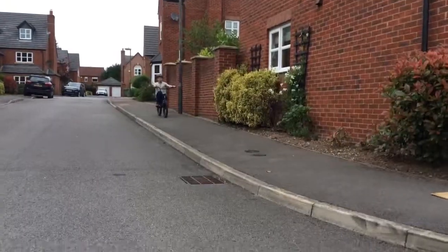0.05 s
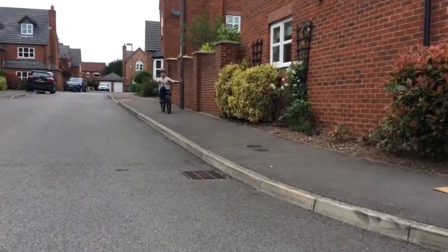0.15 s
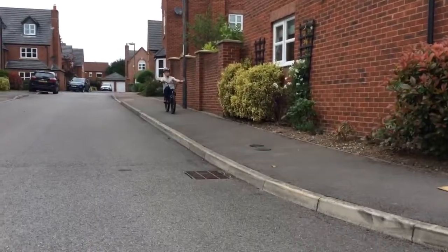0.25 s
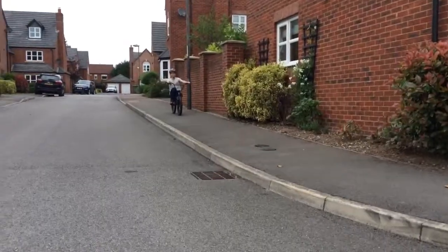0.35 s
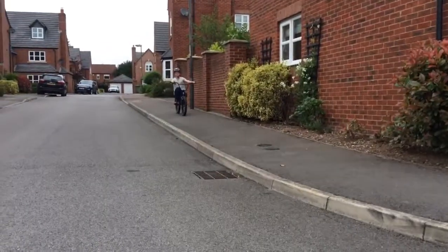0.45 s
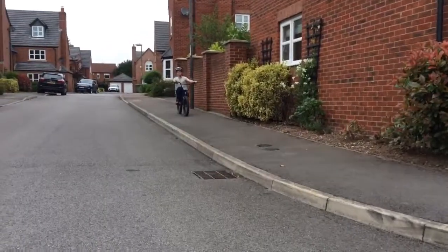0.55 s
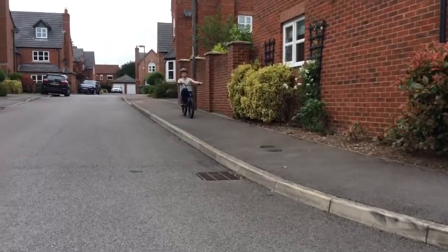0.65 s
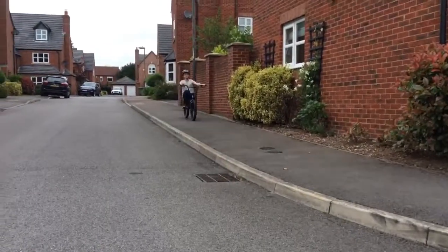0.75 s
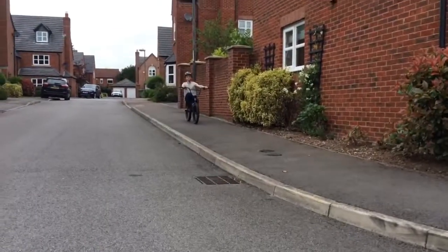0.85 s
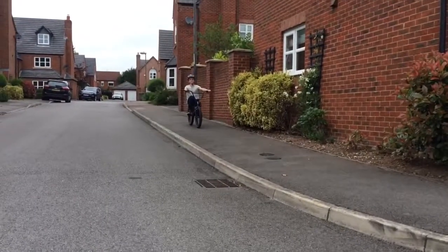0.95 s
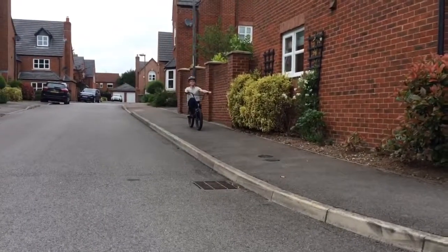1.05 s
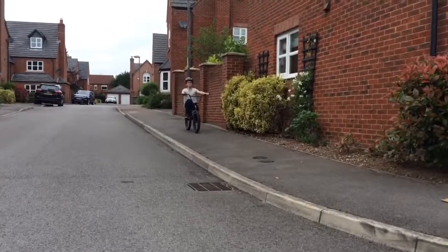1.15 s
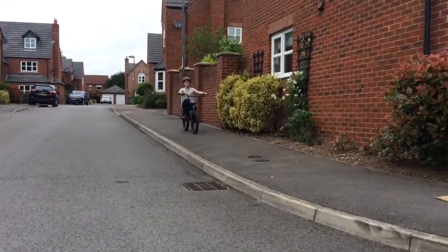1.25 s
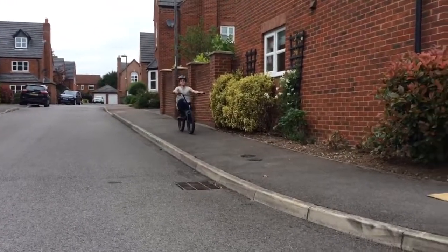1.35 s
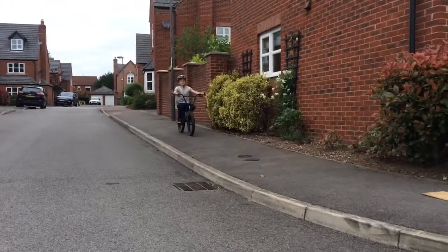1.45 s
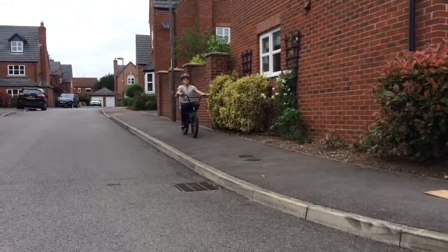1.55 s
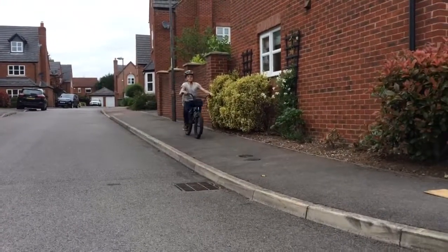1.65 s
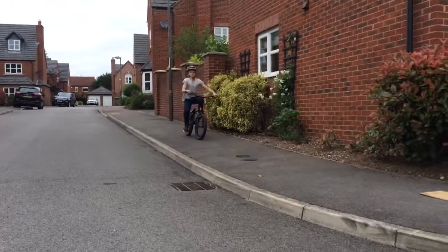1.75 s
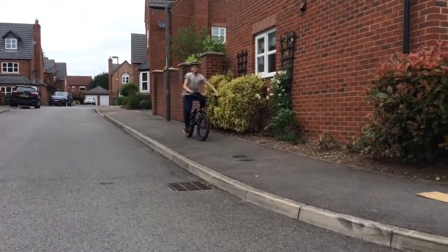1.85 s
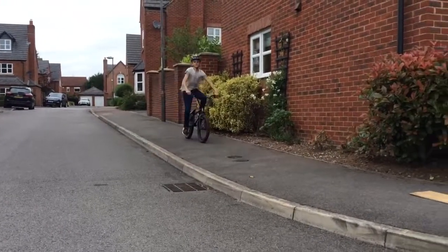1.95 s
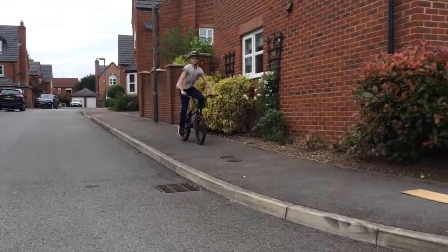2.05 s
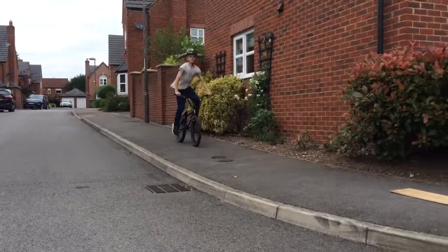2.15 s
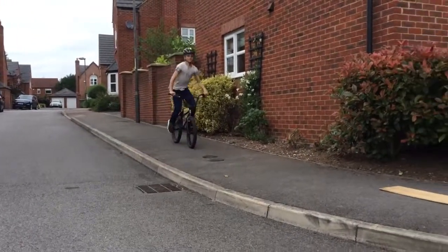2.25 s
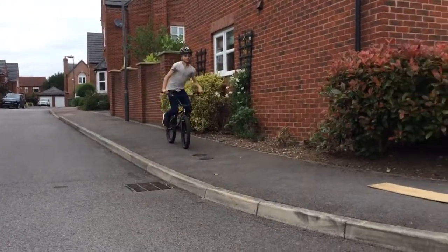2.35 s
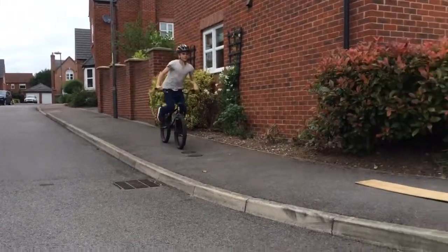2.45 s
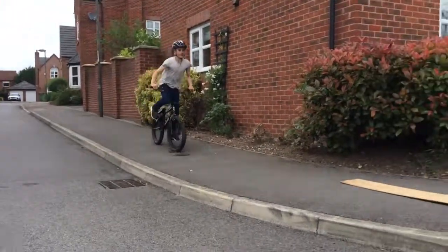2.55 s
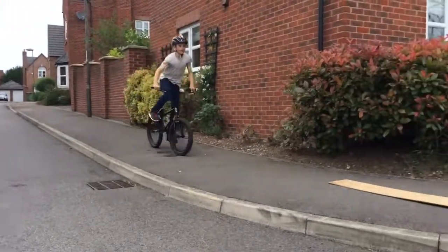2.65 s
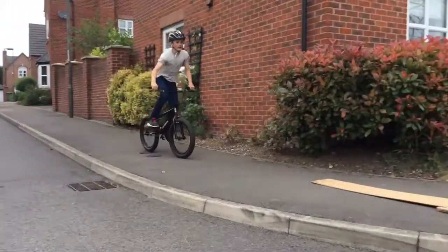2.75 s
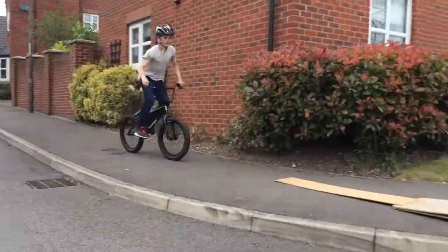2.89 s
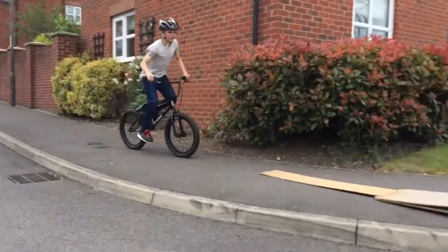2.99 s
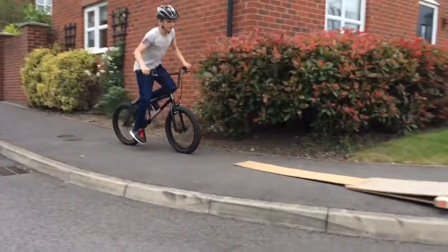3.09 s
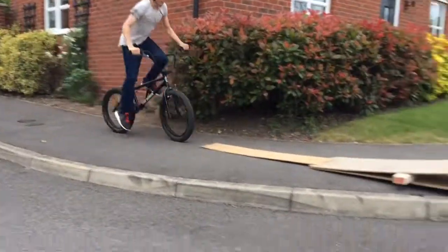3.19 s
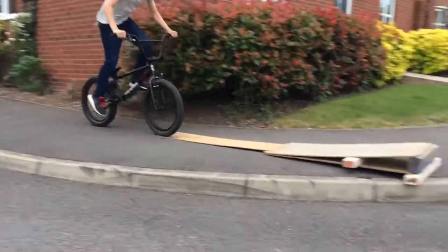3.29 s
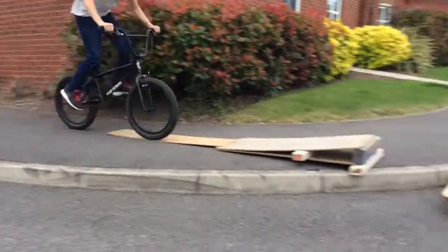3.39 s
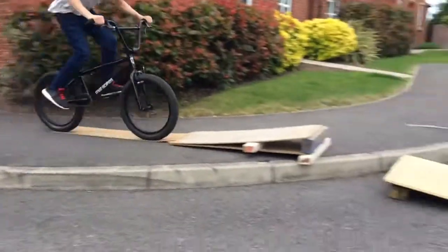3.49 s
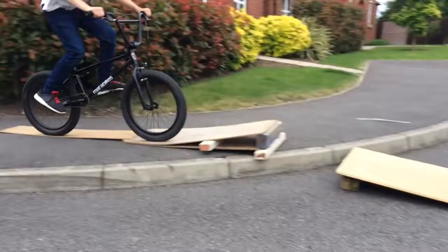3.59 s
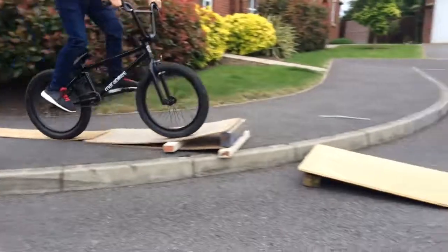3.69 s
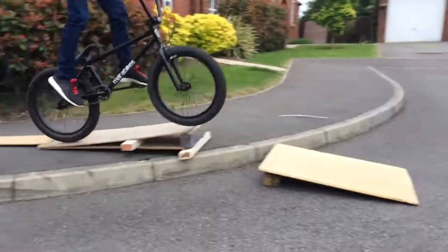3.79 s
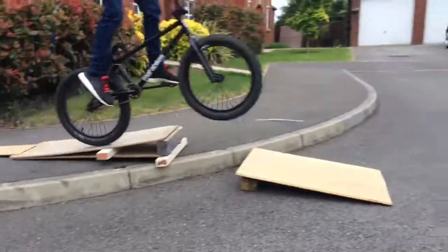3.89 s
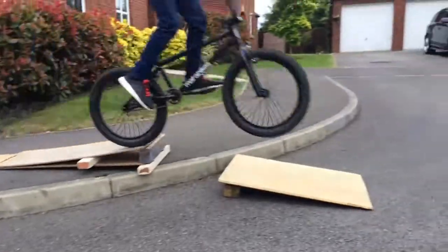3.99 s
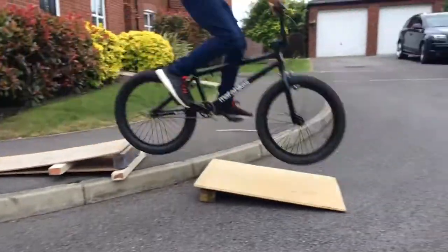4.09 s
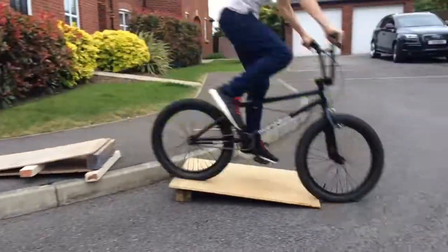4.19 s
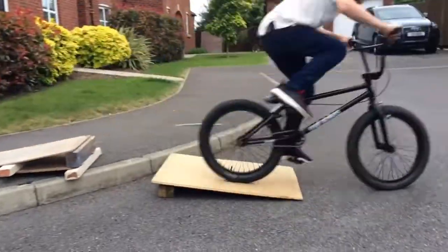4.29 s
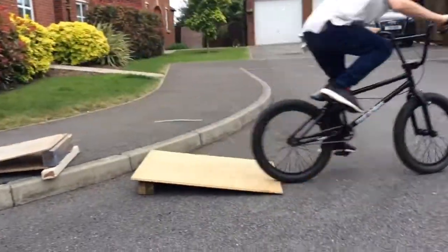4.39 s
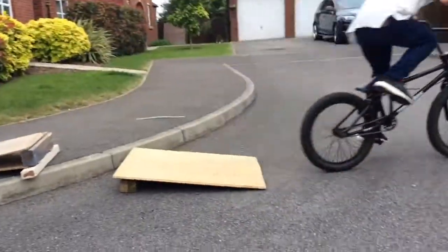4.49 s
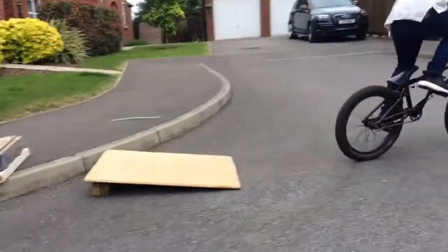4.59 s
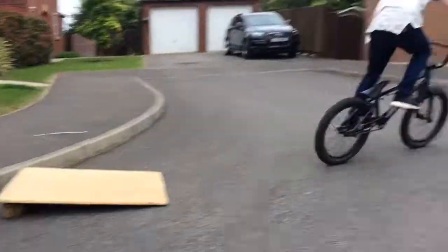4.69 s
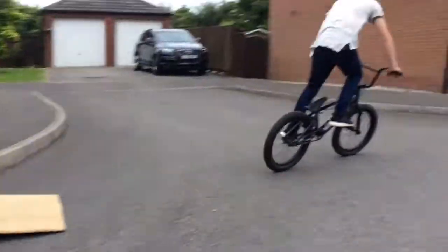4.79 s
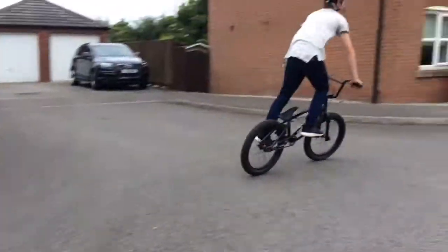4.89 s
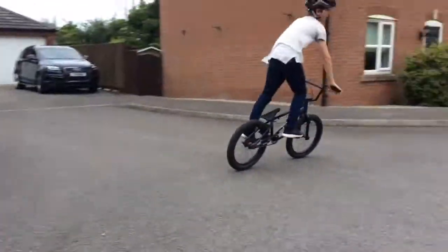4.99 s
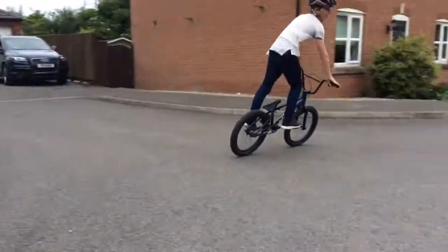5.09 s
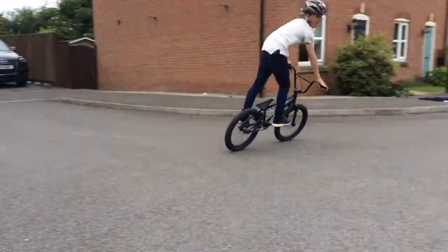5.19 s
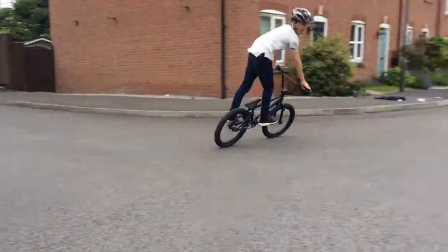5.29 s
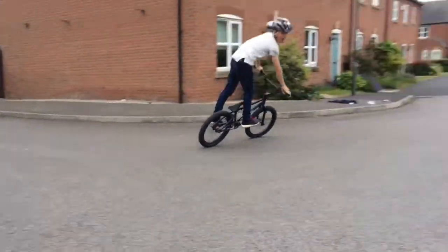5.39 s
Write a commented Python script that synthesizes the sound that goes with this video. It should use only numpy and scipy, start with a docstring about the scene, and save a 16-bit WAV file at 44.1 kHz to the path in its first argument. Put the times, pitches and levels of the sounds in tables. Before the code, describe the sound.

A quiet street with faint low traffic rumble and soft gusts on the microphone. From 0 to about 1.5 s a distant bicycle freewheel ticks at roughly 40 per second, blurred by distance, with a tiny knock at the end; a short flurry of ticks follows near 2 s. Tyre hiss and grit grow as it nears, with dull pavement knocks at 2.6 and 2.9 s. Stones ping from 3.15 s, then a loud sharp crack at 3.35 s. From 3.5 to 4 s loose boards clatter and drum hollowly under fast ticking, with the loudest snaps around 3.9 s. A brief near-silent flight follows, then hard plywood slaps and thuds at 4.25 to 4.32 s, a smaller bounce at 4.4 s, fluttering metal jingle and a short breathy tyre song. Clear ticking, speeding up, rolls away from 4.7 to 5.4 s, with a thin reflected tail from the house fronts.

```python
"""A small stunt bicycle coasts along a quiet street: its freewheel ticks as three pawls drop at every
tooth, and filtered noise makes its tyres hiss, sing and flick grit. They ping stones; it clatters up
loose boards, flies for a moment and lands, one wheel after the other, on a plywood ramp and the road:
sharp pressure pulses crack, damped sines and noise ring the wood, fluttering modes jingle in the metal.
It rolls away over faint traffic and breeze; the house fronts answer with a thin tail of dying noise."""
import sys
import numpy as np
from scipy import signal
from scipy.fft import rfft, irfft
from scipy.io import wavfile

SR = 44100
rng = np.random.default_rng(int(sys.argv[2]) if len(sys.argv) > 2 else 0)


def unload_audio(sound):
    """Save the sound as a 16-bit wav file, at the path given as the first command line argument."""
    columns = np.transpose(np.atleast_2d(sound))
    # keep every value between -1 and 1, then stretch to whole-number steps
    steps = np.round(np.clip(columns, -1, 1) * 32767)
    wavfile.write(sys.argv[1], SR, steps.astype(np.int16))


N = 239948
TIME = np.arange(N) / SR
AGE = TIME[:SR // 3]  # seconds since a blow

# Noise colours set balance only, since the noise is scaled to rms 1.
# distant traffic and air: [f/Hz, level/dB]
STREET = [(20, -21), (50, -4), (86, 0), (125, -5), (190, -7), (330, -16), (550, -20), (1000, -20),
          (1500, -24), (2000, -28), (3000, -32), (6000, -34), (8000, -37), (15000, -40)]
# breeze rumbling on the microphone: [f/Hz, level/dB]
BUFFET = [(20, -28), (45, -4.5), (75, 0), (110, -8), (200, -24), (600, -60), (3000, -100)]
# gusts on the microphone: [t/s, time to fall to 1/e /s, level/dB]
GUSTS = [(0.05, 0.11, -64), (1.0, .4, -63.5), (2.35, 0.068, -65), (4.85, 0.21, -62)]
# the bicycle's distance from the microphone: [t/s, distance/m]
DISTANCE = [(0, 26.6), (1.4, 16.2), (2.05, 9.6), (3.0, 4.15), (3.5, 3.06), (3.83, 2.5), (4.03, 1.73),
            (4.48, 1.22), (4.9, 2.95), (5.44, 2.96)]
# colour of the tread's hiss: [f/Hz, level/dB]
TREAD = [(60, -3), (200, 11), (400, 5.5), (800, 1), (1400, -2.5), (2000, -3), (2800, -8), (4500, -9.5),
         (8000, -19), (15000, -16)]
# colour of tyres drumming on hollow boards: [f/Hz, level/dB]
DRUM = [(40, -18), (120, 8), (300, 0.5), (700, -18), (1500, -16), (4000, -20), (12000, -27)]
# tyres pressed hard at take-off and on landing: [t/s, level of added tread gain/dB, t60/s]
SQUASHES = [(3.84, 14, 0.72), (4.265, 20.5, 0.46)]
# the tread sings as it bites into the road: [t/s, level/dB, t60/s]
BITES = [(4.33, -55, .4), (4.57, -52.5, 0.58), (4.8, -66, 5.1)]
# stretches of coasting; the pedals move, so the pawls' rate swings: a curve each, [t/s, rate/ticks per s]
COASTS = [
    [(0.001, 36.5), (0.3, 35.5), (0.45, 39.6), (0.8, 39.4), (0.9, 43.6), (1.05, 40.7), (1.45, 48.8)],
    [(1.94, 25.1), (2.0, 43.0), (2.07, 16.1)],
    [(3.44, 29.8), (3.55, 70.2), (3.61, 85.6), (3.71, 61.6), (3.8, 46.2), (3.89, 44.8), (3.95, 58.6),
     (4.04, 65.1), (4.09, 18.1)],
    [(4.374, 60.6), (4.41, 87.3), (4.49, 73.9), (4.575, 22.6)],
    [(4.622, 56), (4.645, 56)],
    [(4.692, 29.0), (4.77, 39.8), (4.82, 34.4), (4.95, 39.0), (5.01, 56.6), (5.09, 53.3), (5.14, 74.1),
     (5.22, 65.0), (5.44, 74.6)],
]
# the hub's colour: [f/Hz, level/dB]
PAWL = [(600, -52), (1400, -4), (2000, -2), (2800, -7), (4000, 0.5), (5000, 0), (6400, -6.5), (8000, -4),
        (9700, -2), (11500, 1.5), (12400, -1.5), (13200, 5.5), (13900, -3), (15000, 1)]
# tail of the house fronts, balance only: [f/Hz, level per octave/dB, t60/s]
HOUSES = [(112.6, 0, 0.76), (267, -11.5, 0.83), (516, -12, 1), (1110, -7.5, 0.53), (1820, -7, 0.35),
          (4100, -4.5, 0.64), (8460, -7, 0.72), (15000, 13, 0.12)]
# tyres knock over joints and a cover in the pavement: [t/s, level/dB, hardness/dB]
BUMPS = [(1.556, -60, -8), (2.619, -42, -1), (2.863, -48, -12)]
# body of such a knock before hardness: [f/Hz, level per octave/dB, t60/s]
BUMP = [(200, -4, .08), (400, -3, .06), (800, -3, .045), (1600, -13, .03), (3200, -20, .03),
        (6400, -22, .025)]
# sharp cracks: stones pinged by the tyres, then hard edges of the boards snapping:
# [t/s, level/dB, brightness/dB]
CRACKS = [(3.158, -34.5, 5), (3.2581, -36.5, 8), (3.332, -32, -2), (3.3477, -7, -3), (3.534, -22, 4),
          (3.5445, -11.5, -3.5), (3.8924, -5, -45), (3.9201, -9, -30), (3.9929, -14, -45),
          (4.275, -22.5, -11)]
# brief ring of a crack before brightness: [f/Hz, level/dB, t60/s]
CRACK_MODES = [(1390, -8, 0.001), (2476, -5, 0.006), (3340, -5, 0.0054), (3780, -5, 0.0026),
               (5370, -3, 0.0051), (8040, -14.5, 0.0077)]
# colour of grit, and before brightness of the scatter after a crack: [f/Hz, level/dB]
SPLINTER = [(200, -18), (900, 0.5), (2800, -0.5), (5000, -7.5), (9000, -8.5), (15000, -31)]
# a wheel slaps the take-off boards, then its weight thumps down:
# [t/s, slap level/dB, hardness/dB, lag/s, thump level/dB]
TAKEOFF_BLOWS = [(3.350, -38.5, -6, .026, -45.5), (3.545, -27.5, 4, .0085, -29),
                 (3.675, -34, 3, .016, -26.5), (3.742, -31, -14, 0.0016, -28.5),
                 (3.8935, -18.5, -5.5, .0075, -22.5), (3.921, -36.5, 6, .008, -27.5),
                 (3.994, -33.5, 1, .014, -39.5)]
# what the take-off boards ring with, before load and blow colour: [f/Hz, level/dB, t60/s]
TAKEOFF_MODES = [(114, -18.5, 0.15), (156, -19, 0.11), (209, -13.5, 0.078), (316, -10, 0.095),
                 (511.5, -10, 0.12), (686, -6, 0.1), (920, -12.5, 0.08), (1090, -33, .04),
                 (1513, -9, 0.027), (1610, -11, 0.023), (2220, -19, 0.022)]
# the crowd of weaker wood modes, before load and blow colour: [f/Hz, level per octave/dB, t60/s]
WOOD_CROWD = [(98, -22, 0.15), (195, -11.5, 0.17), (410, -10.5, 0.14), (740, -9, 0.079), (1500, -12, 0.061),
              (3330, -10.5, 0.031), (6300, -20, 0.027), (12800, -26, 0.098)]
# the landing ramp takes the front wheel, hits the road, takes the back wheel and bounces twice:
# [t/s, slap level/dB, hardness/dB, lag/s, thump level/dB]
LANDING_BLOWS = [(4.2535, -22.5, 4, .0077, -20.5), (4.2678, -17, 1, 0.0098, -26.5),
                 (4.3145, -16.5, 0.5, .021, -20), (4.408, -25, -19, .012, -38),
                 (4.531, -46, -31, 0.0082, -41.5)]
# what the plywood rings with, before load and blow colour: [f/Hz, level/dB, t60/s]
LANDING_MODES = [(59, -20, 0.31), (98, -20.5, 0.097), (144, -20, 0.13), (212, -18, 0.034),
                 (317.6, -1.5, 0.1), (385, -5, 0.064), (557, -12, 0.12), (719, -7.5, 0.057),
                 (900, -9.5, 0.1), (982, -6.5, 0.061), (1306, -4.5, 0.047), (1363, -3.5, 0.038),
                 (1772, -7, 0.034), (2236, -9, 0.027), (2900, -6.5, 0.02)]
# jolts to the bicycle's metal parts: [t/s, level/dB]
JOLTS = [(4.325, -37), (4.337, -62), (4.392, -44), (4.401, -42)]
# metal ring before damping and random unevenness: [f/Hz, level/dB, undamped t60/s]
METAL_MODES = [(3311, 0, .25), (3397, -1, .28), (3601, -2, .22), (4050, -8, .18), (4720, -2, .12),
               (5550, -6, .14), (6700, -9, .16), (7950, -7, .14), (9170, -8, .2), (9324, -6, .2),
               (9480, -5, .2), (9663, -9, .25), (10218, -10, .2), (12400, -10, .15)]

STREET_DB, BREEZE_DB = -64.5, -69
ROLL_DB, FLIGHT_DB, GRIP_S = -50, -6.5, 0.037  # tread at 1 m, its change in the air, contact fade
DRUM_DB = -50.5  # tyres drumming on the hollow boards
BOARDS_S, FLIGHT_S = (3.515, 4.02), (4.08, 4.25)  # on the boards, and in the air: (from s, to s)
HUB_DB = -29.5  # a tick at 1 m, before blur and unevenness
BLUR_M = 14.2  # beyond this distance scatter from the walls outweighs the direct tick
# blow colours: (bass dB, middle dB, treble dB); hardness is added to a slap's middle and treble
TAKEOFF_SLAP, TAKEOFF_THUMP = (-1.5, 4.3, 1.5), (-1.2, -10, -7.5)
LANDING_SLAP, LANDING_THUMP = (-13.5, 4.5, -2.7), (4.1, -6, -5.5)
EDGE_HZ = 15400  # cutoff of the recorder's low-pass


def amp(db):
    """Decibels to gain."""
    return 10 ** (np.asarray(db) / 20)


def evened(x):
    """Scales to rms 1."""
    return x / np.sqrt(np.mean(x ** 2) + 1e-20)


def add(mix, s, sound):
    """Lays a sound into the mix at time s."""
    part = mix[max(round(s * SR), 0):][:len(sound)]
    part += sound[:len(part)]


def noise(spectrum, size):
    """Noise of rms 1 with a (Hz, dB) spectrum."""
    hz, db = np.transpose(spectrum)
    log_hz = np.log(np.fft.rfftfreq(size, 1 / SR) + 1)
    colour = amp(np.interp(log_hz, np.log(hz), db))
    return evened(irfft(rfft(rng.standard_normal(size)) * colour, size))


def dying(t, t60):
    """Envelope that loses 60 dB in t60."""
    return np.exp(-np.log(1000) * t / t60)


def ring(modes):
    """Damped sines that all start together, with alternating sign."""
    out = np.zeros(len(AGE))
    for k, (hz, db, t60) in enumerate(modes):
        out += (-1) ** k * amp(db) * dying(AGE, t60) * np.sin(2 * np.pi * hz * AGE)
    return out


def crowd(bands, t):
    """Countless unresolved modes: overlapping bands of noise, each dying at its own speed."""
    octave = np.log2(np.fft.rfftfreq(len(t), 1 / SR) + 1)
    out = np.zeros(len(t))
    for hz, db, t60 in bands:
        window = np.cos(np.pi / 2 * np.clip(octave - np.log2(hz), -1, 1))
        band = evened(irfft(rfft(rng.standard_normal(len(t))) * window, len(t)))
        out += amp(db) * dying(t, t60) * band
    return out


def distance(s):
    """Metres from the bicycle to the microphone at time s."""
    return np.interp(s, *np.transpose(DISTANCE))


def during(start, end):
    """1 from start to end, fading as the tyres make and lose contact."""
    return np.clip(np.minimum(TIME - start, end - TIME) / GRIP_S + .5, 0, 1)


def surges(rows):
    """Gain that rises as the tyres grip and then dies away, once for each (s, dB, t60 s)."""
    out = np.zeros(N)
    for s, db, t60 in rows:
        out += amp(db) * during(s, np.inf) * dying(np.maximum(TIME - s, 0), t60)
    return out


def air():
    """Distant traffic, and a light breeze with a few gusts on the microphone."""
    breeze = np.full(N, amp(BREEZE_DB))
    for s, spread, db in GUSTS:
        breeze += amp(db) * np.exp(-((TIME - s) / spread) ** 2)
    return amp(STREET_DB) * noise(STREET, N) + breeze * noise(BUFFET, N)


def tyres(grit_per_s=60, grit_t60=0.0058, sing_hz=2020, sing_width_hz=380):
    """Tread hisses, sings and flicks grit, hiss and grit louder near and under load; boards drum."""
    stones = (rng.random(N) < grit_per_s / SR) * np.minimum(rng.exponential(1, N), 3)
    grit = signal.oaconvolve(stones, dying(TIME[:1024], grit_t60))[:N] * noise(SPLINTER, N)
    resonance = signal.iirpeak(sing_hz, sing_hz / sing_width_hz, SR)
    song = evened(signal.lfilter(*resonance, rng.standard_normal(N)))
    contact = amp(ROLL_DB + FLIGHT_DB * during(*FLIGHT_S))
    rolling = contact * (1 + surges(SQUASHES)) / distance(TIME)
    drumming = amp(DRUM_DB) * during(*BOARDS_S) * noise(DRUM, N)
    return rolling * (noise(TREAD, N) + grit) + surges(BITES) * song + drumming


def teeth(coast):
    """The moments at which the pawls drop off a tooth, along a curve of (s, ticks per s)."""
    s, rate = np.transpose(coast)
    t = np.arange(s[0], s[-1], 1 / SR)
    passed = np.cumsum(np.interp(t, s, rate)) / SR
    return np.interp(np.arange(0, passed[-1]), passed, t)


def freewheel(pawl_gap=0.0014, click_t60=0.013, scatter_t60=0.086, uneven_db=-0.3, detune=0.023,
              patchy_db=1.5, alike=0.22):
    """Three pawls drop almost together at each tooth; distance fades the click and smears it."""
    out, t = np.zeros(N), TIME[:2048]
    hub = noise(PAWL, len(t))  # the ring that all ticks have in common; alike is its share of the power
    for s in np.concatenate([teeth(coast) for coast in COASTS]):
        drops = pawl_gap * np.array([0, rng.uniform(0.44, 1), rng.uniform(1, 2.8)])
        click = np.zeros(len(t))  # envelopes add up as power
        for drop, force in zip(drops, [.3, .8, .6]):
            click += (t >= drop) * force * dying(abs(t - drop), click_t60) ** 2
        scatter = dying(t, scatter_t60) ** 2 * (1 - np.exp(-t / pawl_gap))
        metres = distance(s)
        blur = metres ** 2 / (metres ** 2 + BLUR_M ** 2)
        power = (1 - blur) * click + blur * scatter
        tooth = 1 + detune * rng.standard_normal()  # every tooth rings the hub a little differently
        colour = [(hz * tooth, db + patchy_db * rng.standard_normal()) for hz, db in PAWL]
        tone = np.sqrt(alike) * hub + np.sqrt(1 - alike) * noise(colour, len(t))
        level = amp(HUB_DB + uneven_db * rng.standard_normal()) / metres
        add(out, s, level * np.sqrt(power) * tone)
    return out


def street(x, wet_db=-25, delay=0.0076, build=0.021):
    """House fronts and garden walls return a thin, late tail."""
    t = TIME[:SR]
    tail = crowd(HOUSES, t) * (1 - np.exp(-np.maximum(t - delay, 0) / build))
    return x + amp(wet_db) * signal.fftconvolve(x, tail / np.linalg.norm(tail))[:N]


def bumps():
    """Short dull knocks of the tyres on the pavement; hardness sets their upper bands."""
    out = np.zeros(N)
    for s, db, hard_db in BUMPS:
        bands = [(hz, d + hard_db * np.interp(hz, [400, 1200], [0, 1]), t60) for hz, d, t60 in BUMP]
        add(out, s, amp(db) * crowd(bands, AGE))
    return out


def brightened(rows, bright_db):
    """Tilts the treble of (Hz, dB, ...) rows, fully from 8 kHz up."""
    return [(hz, db + bright_db * np.interp(hz, [4300, 8000], [0, 1]), *rest) for hz, db, *rest in rows]


def cracks(snap_db=-1, snap_hz=3400, ring_db=-3, scatter_db=-23, scatter_t60=0.075,
           burst_db=-14, burst_t60=0.017, low_hz=1400):
    """Pinged stones, then snapping board edges: a pressure pulse, a brief ring, scatter from the ground."""
    out = np.zeros(N)
    spread = amp(scatter_db) * dying(AGE, scatter_t60) + amp(burst_db) * dying(AGE, burst_t60)
    u = np.pi * snap_hz * AGE - np.e
    snap = amp(snap_db) * (2 * u ** 2 - 1) * np.exp(-u ** 2)  # air squeezed out, then a suction
    for s, db, bright_db in CRACKS:
        body = amp(ring_db) * ring(brightened(CRACK_MODES, bright_db))
        scatter = spread * noise(brightened(SPLINTER, bright_db), len(AGE))
        add(out, s, amp(db) * (snap + body + scatter))
    thin = signal.butter(2, low_hz, "high", fs=SR)  # the cracks carry no bass
    return signal.lfilter(*thin, out)


def contacts(rows, slap, thump):
    """Each wheel contact is two blows, slap then thump: (s, dB, bass dB, middle dB, treble dB)."""
    bass_db, middle_db, treble_db = slap
    blows = []
    for s, slap_db, hard_db, lag, thump_db in rows:
        blows.append((s, slap_db, bass_db, middle_db + hard_db, treble_db + hard_db))
        blows.append((s + lag, thump_db, *thump))
    return blows


def rattle(per_s=50, tap_db=-44, uneven_db=5.5, bass_db=-6, middle_db=1, treble_db=4):
    """The loose boards tap against each other at random while the wheels roll over them."""
    blows = []
    for slot in np.arange(*BOARDS_S, 1 / per_s):
        s = slot + rng.random() / per_s
        blows.append((s, tap_db + uneven_db * rng.standard_normal(), bass_db, middle_db, treble_db))
    return blows


def struck(rows, bass_db, middle_db, treble_db, detune):
    """Colours wood modes for one blow and shifts them under the wheel's weight."""
    hz, mode_db, t60 = np.transpose(rows)
    bends = np.log([330, 750, 1400, 3000])
    colour = np.interp(np.log(hz), bends, [bass_db, 0, middle_db, treble_db])
    load = 1 + detune * rng.standard_normal(len(hz))
    return zip(hz * load, mode_db + colour, t60)


def boards(blows, modes, crowd_db, rise, detune=0.018):
    """Each blow rings the wood; a soft tyre favours the low modes, a hard slap the high ones."""
    out = np.zeros(N)
    for s, db, *colour in blows:
        clear = ring(struck(modes, *colour, detune))
        dense = amp(crowd_db) * crowd(struck(WOOD_CROWD, *colour, detune), AGE)
        add(out, s, amp(db) * (clear + dense) * (1 - np.exp(-AGE / rise)))
    return out


def jingle(uneven_db=4.5, rough=0.98, chatter_hz=70, damping=0.58, clatter_db=-1, clatter_t60=0.14):
    """Spokes and chain ring after the landing, chattering together so that every mode flutters."""
    out = np.zeros(N)
    flutter = [(chatter_hz, 0), (2 * chatter_hz, -10), (10 * chatter_hz, -60)]  # (Hz, dB)
    for s, db in JOLTS:
        for hz, mode_db, t60 in METAL_MODES:
            mode = ring([(hz, mode_db + uneven_db * rng.standard_normal(), damping * t60)])
            add(out, s, amp(db) * mode * (1 - rough + rough * noise(flutter, len(AGE))))
        links = noise(PAWL, len(AGE)) * noise(flutter, len(AGE))  # the chain shakes on the hub
        add(out, s, amp(db + clatter_db) * dying(AGE, clatter_t60) * links)
    return out


def scene():
    """The bicycle, the two ramps and the street."""
    takeoff_blows = contacts(TAKEOFF_BLOWS, TAKEOFF_SLAP, TAKEOFF_THUMP) + rattle()
    takeoff = boards(takeoff_blows, TAKEOFF_MODES, crowd_db=2.5, rise=0.00022)
    landing_blows = contacts(LANDING_BLOWS, LANDING_SLAP, LANDING_THUMP)
    landing = boards(landing_blows, LANDING_MODES, crowd_db=0.0, rise=0.00015)
    bicycle = tyres() + freewheel() + bumps() + cracks() + takeoff + landing + jingle()
    return (air() + street(bicycle))[None]


def record(dry):
    """The recorder's band limit: a steep low-pass closes the top end."""
    low_pass = signal.firwin(301, EDGE_HZ, window=("kaiser", 7), fs=SR)
    return signal.oaconvolve(dry, low_pass[None], "same")


dry = scene()
out = record(dry)
unload_audio(out)
```